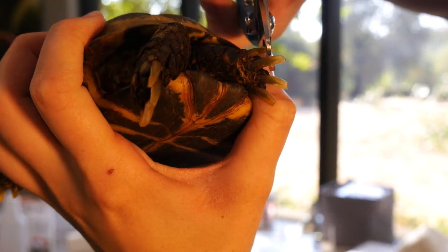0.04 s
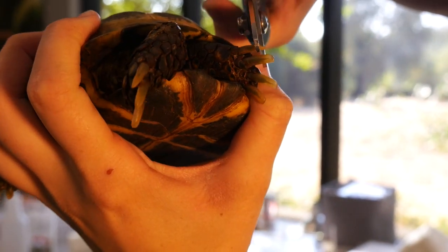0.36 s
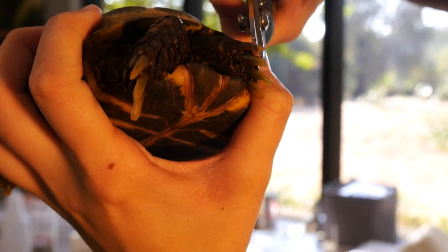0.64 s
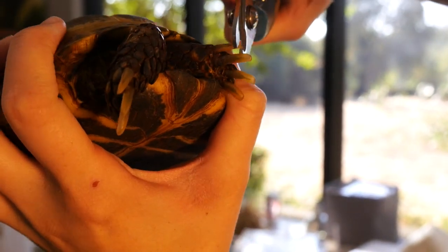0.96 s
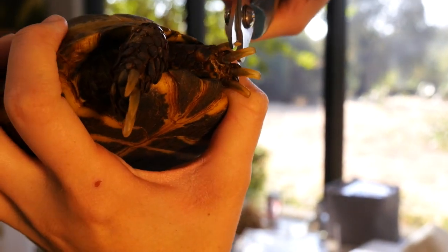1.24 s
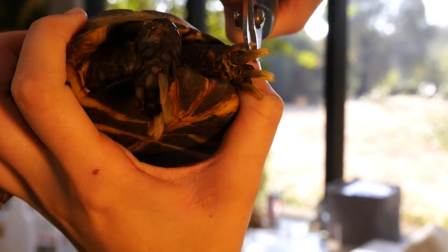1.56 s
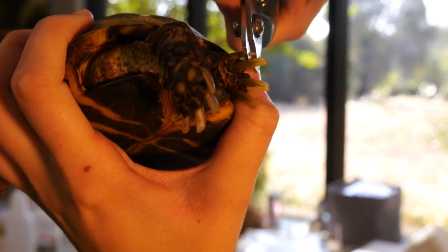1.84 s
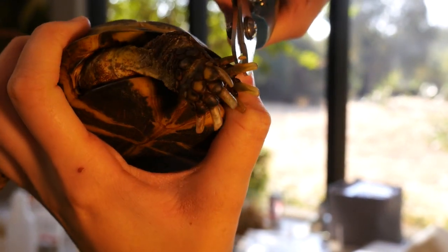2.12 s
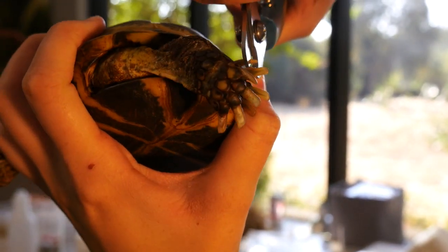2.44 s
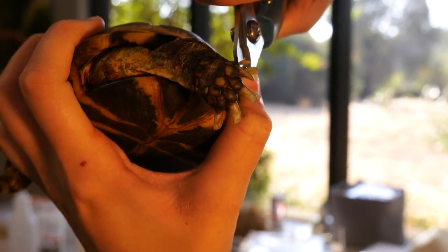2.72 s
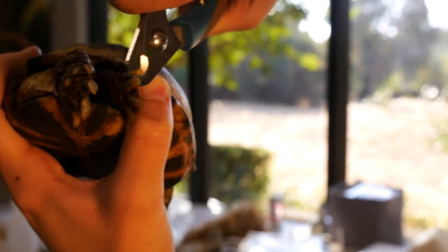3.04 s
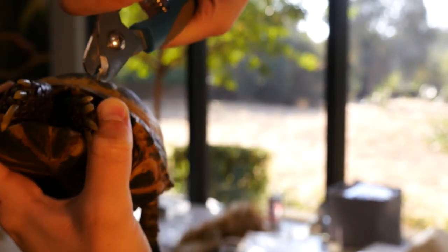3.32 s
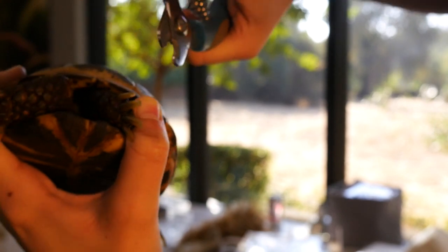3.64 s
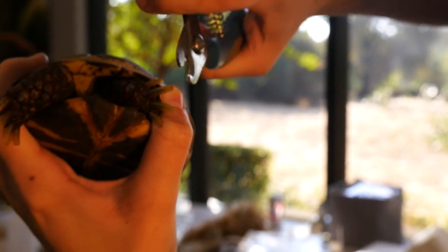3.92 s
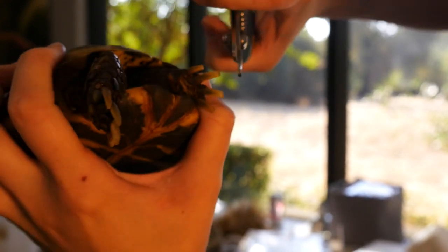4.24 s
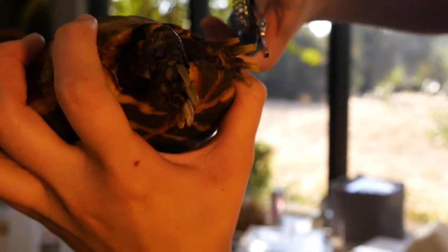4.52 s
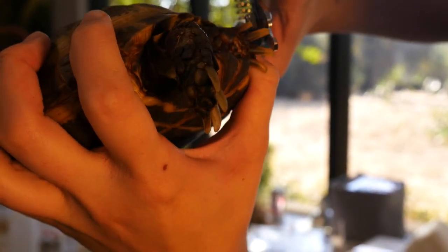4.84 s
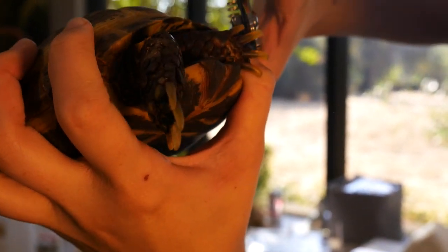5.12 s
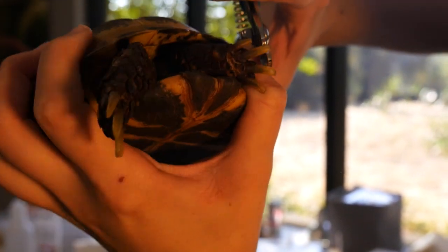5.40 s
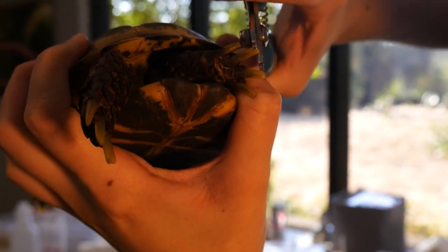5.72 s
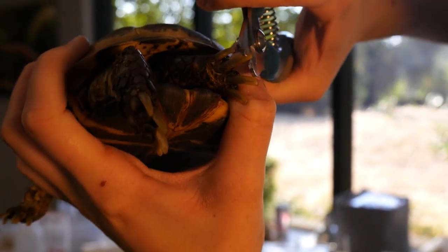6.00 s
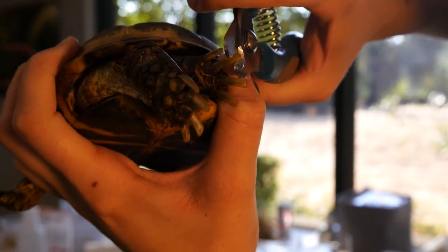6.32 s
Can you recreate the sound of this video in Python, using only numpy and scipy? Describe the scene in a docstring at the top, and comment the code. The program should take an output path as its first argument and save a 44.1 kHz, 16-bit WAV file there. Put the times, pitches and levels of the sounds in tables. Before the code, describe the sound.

Two crickets, one near and one faint and distant, chirp quickly above a steady low outdoor rumble. Close by, fingers brush over a turtle's shell with light ticks from steel clippers. Midway comes the sharp crack of a claw being cut, followed at once by the metallic snap of the closing jaws, briefly reflected by the porch. A few hollow taps and more quiet rubbing follow as the crickets continue.

```python
"""Trimming a turtle's claws on a porch

Over a low outdoor rumble, two crickets chirp by stridulation, drawing a scraper along a toothed wing.
Hands rub and tap on the turtle's shell, and blade and claw tick together. The clippers fracture a claw
and snap shut, each impact ringing their steel. The roofed porch reflects the clicks and chirps."""
import sys
import numpy as np
from scipy import signal
from scipy.fft import rfft, irfft
from scipy.io import wavfile

SR = 44100
rng = np.random.default_rng(int(sys.argv[2]) if len(sys.argv) > 2 else 0)


def wav_out(sig):
    """Save sig, one row per channel (or a flat mono array), as 16-bit PCM at SR to the path in sys.argv[1]."""
    wavfile.write(sys.argv[1], SR, np.round(np.clip(np.atleast_2d(sig).T, -1, 1) * 32767).astype(np.int16))


N = 284886


def amp(db):
    """Amplitude ratio of a level in decibels."""
    return 10 ** (np.asarray(db) / 20)


def unit_rms(x):
    """Normalisation to unit mean power."""
    return x / np.sqrt(np.mean(abs(x) ** 2) + 1e-20)


def read(points, hz):
    """Linear interpolation on a log-frequency axis."""
    f, value = np.transpose(points)
    return np.interp(np.log(hz + 1), np.log(f + 1), value)


def add(mix, s, sound):
    """Superposition of a sound starting at time s, which may be negative."""
    at = round(s * SR)
    sound = sound[max(-at, 0):]
    part = mix[max(at, 0):][:len(sound)]
    part += sound[:len(part)]


def envelope(t, attack_s, hold_s, release_s):
    """Trapezoidal envelope: rises from 0 to 1, holds, and falls to 0."""
    return np.interp(t, np.cumsum([0, attack_s, hold_s, release_s]), [0, 1, 1, 0])


def noise(gain, correlation):
    """Partially coherent stereo noise, from a gain and a left-right correlation at each frequency."""
    left, independent = rfft(rng.standard_normal((2, N)))
    right = correlation * left + np.sqrt(1 - correlation ** 2) * independent
    return unit_rms(irfft(np.array([left, right]) * gain, N))


def flutter(size, width_hz):
    """Complex narrow-band random modulation whose spectrum falls beyond width_hz."""
    hz = np.fft.fftfreq(size, 1 / SR)
    z = rng.standard_normal(size) + 1j * rng.standard_normal(size)
    return unit_rms(np.fft.ifft(z / (1 + (hz / width_hz) ** 2)))


def causal(colour, size=2048):
    """Minimum-phase impulse response of a spectrum, with unit energy."""
    db = read(colour, abs(np.fft.fftfreq(size, 1 / SR)))
    log_gain = np.log(amp(np.maximum(db, -80)))
    response = np.fft.ifft(np.exp(np.conj(signal.hilbert(log_gain)))).real[:size // 2]
    return response / np.linalg.norm(response)


def burst(t60, size=1024):
    """Broadband excitation: a decaying cluster of tiny fractures, with unit energy."""
    fade = amp(-60 * np.arange(size) / SR / t60)
    x = rng.standard_normal(size) * fade
    for _ in range(4):  # flatten the spectrum, then restore the decay
        x = irfft(np.exp(1j * np.angle(rfft(x)))) * np.sqrt(fade)
    return x / np.linalg.norm(x)


def background(rumble_db=-49.5, waver_db=.25, waver_hz=3, hiss_db=-66, swell_db=-46.5, swell_hz=263):
    """Spectrally shaped noise: a wavering rumble with one late swell, two droning bands and faint hiss."""
    # outdoor rumble and hiss spectra: (frequency [Hz], level [dB])
    rumble_colour = [(15, -62), (25, -26.5), (58, -25.5), (81, -15), (107, -12.5), (128, -10), (145, -3.5),
                     (250, -7), (370, -8), (421, -10.5), (460, -13.5), (863, -18.5), (2060, -32),
                     (4500, -37), (5850, -79), (9900, -120)]
    hiss_colour = [(2000, -24), (4000, -10), (6500, 9), (8500, -2.5), (10500, 0), (12500, -6.5),
                   (15200, -7), (16000, -36.5)]
    # likeness at the two ears: (frequency [Hz], correlation [ratio])
    coherence = [(60, 0.48), (120, 0.8), (240, 0.84), (480, 0.51), (950, 0.28), (1890, 0.14), (3770, 0.18),
                 (7520, 0.93), (15000, 0.37)]
    # droning bands: (centre [Hz], half-width [Hz], level [dB])
    drones = [(144.5, 8.1, -57), (190.5, 19, -58)]
    hz, t = np.fft.rfftfreq(N, 1 / SR), np.arange(N) / SR
    correlation = read(coherence, hz)
    rumble_gain = amp(rumble_db + waver_db * flutter(N, waver_hz).real)
    rumble = rumble_gain * noise(amp(read(rumble_colour, hz)), correlation)
    swell_gain = amp(swell_db) * envelope(t - 6.12, attack_s=.11, hold_s=0, release_s=.26)
    swell_band = 1 / (1 + (2 * np.log2((hz + 1) / swell_hz)) ** 4)
    swell = swell_gain * noise(swell_band, correlation)
    drone = sum(amp(db) * noise(1 / (1 + ((hz - f) / width) ** 2), correlation) for f, width, db in drones)
    hiss = amp(hiss_db) * noise(amp(read(hiss_colour, hz)), correlation=.31)
    return rumble + swell + drone + hiss


def porch_tail(side, rise_s):
    """Diffuse reverberation: dense reflections build up, then decay exponentially in each band."""
    # porch decay: (frequency [Hz], reverberation time [s])
    decay = [(300, 1.1), (2000, 0.62), (5000, 0.55), (8000, 0.44), (11000, 0.51), (15000, 0.2)]
    # initial spectrum of the reverberation: (frequency [Hz], level [dB])
    colour = [(300, 6.5), (4000, 2.5), (10500, -3), (15000, -2), (16000, -8)]
    hz, t, bands = signal.stft(rng.standard_normal((2, SR)), SR, nperseg=256)
    level_db = read(colour, hz)[:, None] - 60 * t / read(decay, hz)[:, None]
    mid, wide = signal.istft(bands * amp(level_db), SR, nperseg=256)[1][:, :SR]
    build_up = 1 - np.exp(-np.arange(SR) / SR / rise_s)
    tail = np.array([mid + side * wide, mid - side * wide]) * build_up
    return tail / np.linalg.norm(tail[0])


def early(x, echo_db, apart=0):
    """Direct sound plus discrete reflections; apart tilts the treble between left and right."""
    # early reflections of the porch: (delay [s], level [dB])
    echoes = [(.007, -13), (.0121, -20), (0.0158, -29), (0.0211, -29)]
    response = np.zeros((2, SR // 10))
    response[:, 0], response[:, 1] = 1, [apart, -apart]
    for delay, db in echoes:
        response[:, round(delay * SR)] += amp(db + echo_db)
    return signal.oaconvolve(x[None], response, axes=1)[:, :N]


def late(x, tail):
    """Reverberant field: convolution with the porch's diffuse tail."""
    return signal.fftconvolve(x[None], tail, axes=1)[:, :N]


def chirp_train(bouts, period_s=.148, first_db=-1, jitter_s=.001, spread_db=.6):
    """Quasi-periodic chirps (time [s], level [dB]); the period stretches to fill each bout."""
    beats = np.array([(s, db + first_db * (s == first)) for first, last, db in bouts
                      for s in np.linspace(first, last, round((last - first) / period_s) + 1)])
    return beats + rng.standard_normal(beats.shape) * [jitter_s, spread_db]


def wing_stroke(lead_s, edge_s, opening_s, opening_db, rest_s, closing_s, swell_db,
                tooth_hz, push_hz, scrape, grip):
    """Contact pressure as the wings open, then close: more pressure gives a higher, cleaner tone."""
    t = np.arange(0, opening_s + rest_s + closing_s + 4 * edge_s, 1 / SR)
    closing_t = t - opening_s - rest_s - 2 * edge_s
    opening = amp(opening_db) * envelope(t, edge_s, opening_s, edge_s)
    closing = amp(swell_db * (closing_t / closing_s - 1.5)) * envelope(closing_t, edge_s, closing_s, edge_s)
    pressure = opening + closing
    return t - lead_s, pressure, tooth_hz + push_hz * pressure, scrape * (1 - grip * pressure)


def cricket(chirps, stroke, slip_hz, slip_width_hz, rasp_width_hz, fresh, lower_db, overtone_db):
    """Stridulation: a tone at the tooth rate, roughened by teeth that are partly alike in every chirp."""
    t, pressure, hz, scrape = stroke
    worn, teeth = flutter(len(t), slip_width_hz), flutter(len(t), rasp_width_hz)
    out = np.zeros(N)
    for start, db in chirps:
        # the scraper catches and slips, so the tooth rate wavers
        slip = (worn + fresh * flutter(len(t), slip_width_hz)).real
        tooth_rate = hz + slip_hz * unit_rms(slip - slip.mean())
        tone = np.exp(2j * np.pi * np.cumsum(tooth_rate) / SR)
        rasp = scrape * unit_rms(teeth + fresh * flutter(len(t), rasp_width_hz))
        # the rasp also shakes a lower, weaker mode of the wing
        lower = scrape * flutter(len(t), 180) * np.exp(2j * np.pi * .92 * hz.mean() * t)
        wing = (1 + rasp) * tone + amp(lower_db) * lower + amp(overtone_db) * rasp * tone ** 2
        add(out, start + t[0], amp(db) * unit_rms(pressure * wing.real))
    return out


def near_cricket(tail, wall_delay_s=.031, wall_db=-15):
    """Close stridulation, slightly to the left, with a specular reflection from a wall."""
    # bouts of chirping: (first chirp [s], last chirp [s], level [dB])
    bouts = [(-.066, .085, 1.7), (.236, 1.272, 0.35), (1.435, 2.459, 1.15), (2.625, 3.222, 0.3),
             (3.417, 5.504, 1.14), (5.679, 6.294, 1.3)]
    stroke = wing_stroke(lead_s=.0055, edge_s=.0042, opening_s=.008, opening_db=-4.5, rest_s=.002,
                         closing_s=.037, swell_db=1.5, tooth_hz=6622, push_hz=79.9, scrape=.56, grip=.56)
    song = cricket(chirp_train(bouts), stroke, slip_hz=143.5, slip_width_hz=221, rasp_width_hz=700,
                   fresh=.66, lower_db=-10, overtone_db=-33.5)
    add(song, wall_delay_s, amp(wall_db) * song)
    return unit_rms(early(song, echo_db=6) + amp(-4) * late(song, tail)) * amp([[.4], [-.4]])


def far_cricket(tail):
    """Distant stridulation: a slower tooth rate gives a lower pitch, and the two strokes overlap."""
    # bouts of chirping: (first chirp [s], last chirp [s], level [dB])
    bouts = [(-.045, .701, -1), (.899, 3.145, -1), (3.27, 3.838, 0.3), (4.11, 4.282, -1), (4.572, 5.143, 1),
             (5.282, 5.415, -2)]
    stroke = wing_stroke(lead_s=-.014, edge_s=.011, opening_s=.005, opening_db=4.5, rest_s=-.006,
                         closing_s=.014, swell_db=-.5, tooth_hz=5240, push_hz=20, scrape=.8, grip=.2)
    song = cricket(chirp_train(bouts), stroke, slip_hz=110, slip_width_hz=260, rasp_width_hz=249,
                   fresh=1.8, lower_db=-16, overtone_db=-30)
    return unit_rms(early(song, echo_db=-5.5) + amp(-4.5) * late(song, tail))


def rubbing(grains_per_s=1300, grain_db=2.5, smooth=.77, rise=.16, shifts_per_s=2.5, size=16384):
    """Stick-slip friction of skin on shell: fine grains in a soft hiss that swells quickly and fades."""
    # firm strokes: (time [s], duration [s], level [dB], tilt [dB/octave])
    strokes = [(-.03, 0.17, -55, .5), (0.208, 0.12, -59.5, 2), (0.402, 0.085, -61, 0),
               (0.567, 0.14, -58.5, 0), (0.809, 0.36, -63, 3.5), (2.029, 0.15, -59.5, 0.5),
               (2.188, 0.087, -60.5, -2), (2.568, .16, -64, 2), (3.229, 0.083, -56, -2),
               (3.455, 0.084, -54.5, 2), (4.061, 0.15, -63.5, -5.5), (4.5, 0.11, -61.5, 1.5),
               (4.579, .24, -64, -0.5), (4.913, 0.075, -57, 3.5), (5.129, 0.18, -51, 0.5),
               (5.317, 0.089, -56, 1), (5.419, 0.065, -60.5, 1), (6.083, 0.27, -66, -4)]
    # friction spectrum: (frequency [Hz], level [dB])
    friction_colour = [(500, -16.5), (1200, -3.5), (2200, -1), (3500, -0.5), (5200, 0.5), (7500, -3),
                       (10500, -11.5), (13000, -28), (15000, -26), (16000, -36)]
    grip_shifts = [(s + rng.random() / shifts_per_s, .11, -73.5, -1)  # same columns as the strokes
                   for s in np.arange(0, N / SR, 1 / shifts_per_s)]
    t, out = np.arange(size) / SR, np.zeros(N)
    for s, length, db, tilt_db in strokes + grip_shifts:
        slipping = rng.random(size) < grains_per_s / SR
        force, hiss = rng.exponential(1, size), rng.standard_normal(size)
        grains = amp(grain_db * np.minimum(force, 3)) * np.sign(hiss) * slipping
        colour = [(hz, level + tilt_db * np.log2(hz)) for hz, level in friction_colour]
        friction = signal.fftconvolve(unit_rms(grains) + smooth * hiss, causal(colour))[:size]
        add(out, s, amp(db) * unit_rms(friction) * envelope(t / length, rise, 0, 1 - rise))
    return out


def taps(blur_hz=190, rise_s=.00074):
    """Damped resonance: each soft contact with the shell excites one short, rough note."""
    # hollow taps: (time [s], level [dB], pitch [Hz], 60 dB decay time [s])
    contacts = [(0.133, -54, 1620, 0.13), (1.025, -59, 1800, 0.14), (3.131, -44, 951, 0.089),
                (3.14, -42.5, 1654, 0.067), (4.085, -43, 547, 0.12), (4.71, -45, 2490, .025),
                (4.778, -51, 3030, 0.018), (4.925, -49, 3280, 0.11)]
    t, out = np.arange(0, .2, 1 / SR), np.zeros(N)
    for s, db, hz, t60 in contacts:
        note = (flutter(len(t), blur_hz) * np.exp(2j * np.pi * hz * t)).real
        add(out, s, amp(db - 60 * t / t60) * (1 - np.exp(-t / rise_s)) * note)
    return out


def ticks(t60=.016, skirt_db=-5):
    """Impulse excitation: each light contact of blade and claw drives one broad resonance."""
    # light contacts: (time [s], level [dB], centre frequency [Hz])
    contacts = [(.031, -11.5, 9000), (0.053, -8.5, 10100), (0.219, -12, 7000), (0.824, -11, 5994),
                (2.835, -8, 11200), (2.8533, -3, 9200), (3.1933, -8, 8080), (3.245, -6, 4500),
                (4.5049, -10.5, 10000), (5.329, -7, 5000), (5.875, -12, 10520)]
    out = np.zeros(N)
    for s, db, hz in contacts:
        colour = [(hz / 10, 2 * skirt_db), (hz / 2, skirt_db), (hz, 0), (13000, -12), (16000, -34)]
        add(out, s, amp(db) * signal.fftconvolve(burst(t60), causal(colour)))
    return out


def clippers(blows, colour, tail, ring_db, wet_db):
    """Modal ringing: each sharp blow excites the steel's damped modes and the porch's reverberation."""
    # modes of the steel: (frequency [Hz], level [dB], 60 dB decay time [s])
    modes = [(2480, -32, 0.02), (2770, -39.5, 0.022), (5505, -13, 0.0071), (7720, -28, 0.028),
             (9170, -23.5, 0.014), (10500, -21.5, 0.014)]
    # spectrum radiated in all directions: (frequency [Hz], level [dB])
    radiation = [(300, -17), (800, -8), (1550, -8.5), (2050, -.5), (3000, -1.5), (4000, -7), (5500, 1.5),
                 (7000, 2.5), (10300, 4), (12000, -8.5), (15000, -4), (16000, -26.5)]
    t, excitation = np.arange(2048) / SR, np.zeros(N)
    body = amp(ring_db) * sum(amp(db - 60 * t / t60) * np.sin(2 * np.pi * hz * t) for hz, db, t60 in modes)
    add(body, 0, causal(colour))
    for s, db, t60 in blows:
        add(excitation, s, amp(db) * burst(t60))
    direct = signal.oaconvolve(excitation, body)[:N]
    radiated = signal.oaconvolve(excitation, causal(radiation))[:N]
    return early(direct, echo_db=-.5, apart=.11) + amp(wet_db) * late(radiated, tail)


def claw_crack(tail):
    """Brittle fracture: the claw gives way between the blades in a rapid run of cracks."""
    # cracks: (time [s], level [dB], 60 dB decay time [s])
    cracks = [(2.9111, -22.5, 0.0062), (2.9158, -14, .005), (2.9172, -12.5, 0.0039), (2.9181, -5, 0.007)]
    # fracture spectrum: (frequency [Hz], level [dB])
    colour = [(180, -50), (350, -9), (780, -15.5), (1880, 3), (2400, -4), (3030, -0.5), (3710, -8.5),
              (4540, -11), (5460, 4), (5930, 4), (6670, -8.5), (7890, 0), (12200, -2.5), (13500, -10),
              (15400, -15), (16500, -40)]
    return clippers(cracks, colour, tail, ring_db=-21, wet_db=-10.5)


def jaw_snap(tail):
    """Hard impact: the jaws snap shut and ring the steel strongly."""
    # impact: (time [s], level [dB], 60 dB decay time [s])
    snaps = [(3.0502, 1, 0.0093)]
    # impact spectrum: (frequency [Hz], level [dB])
    colour = [(180, -50), (300, -27), (834, -8), (1430, -12.5), (1870, -5.5), (2480, -4.5), (2740, -3),
              (3710, -22), (4770, -12.5), (5460, 3.5), (6900, -7), (9180, -2), (10500, -4), (13300, -21.5),
              (14900, -12), (16500, -15.5)]
    return clippers(snaps, colour, tail, ring_db=-8.5, wet_db=-11)


def scene():
    """Superposition of crickets, clippers and hands in one porch, over the outdoor background."""
    tail = porch_tail(side=.33, rise_s=.0028)
    crickets = amp(-50) * near_cricket(tail) + amp(-67.5) * far_cricket(tail)
    cut = amp(8.5) * claw_crack(tail) + amp(8) * jaw_snap(tail)
    handling = amp(-22) * ticks() + taps() + amp(1) * rubbing()
    hands = early(handling, echo_db=-6) + amp(-6.5) * late(handling, tail)
    return background() + crickets + hands + cut


def record(dry):
    """Output shaping: a narrow treble notch, the loudest snaps clipped, a low cut and a band limit."""
    notched = signal.lfilter(*signal.iirnotch(7860, Q=70, fs=SR), dry)
    clipped = np.clip(notched, -.92, .92)
    low_cut = signal.lfilter(*signal.butter(2, 38, "highpass", fs=SR), clipped)
    band_limit = signal.firwin(255, cutoff=16500, window=("kaiser", 9), fs=SR)
    return signal.oaconvolve(low_cut, band_limit[None], "same")


dry = scene()
out = record(dry)
wav_out(out)
```